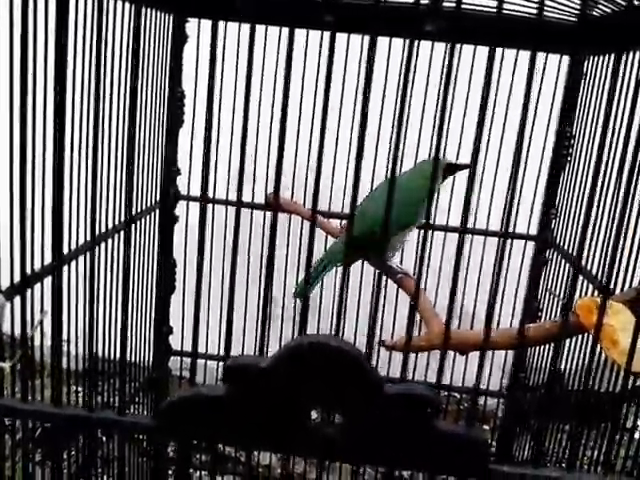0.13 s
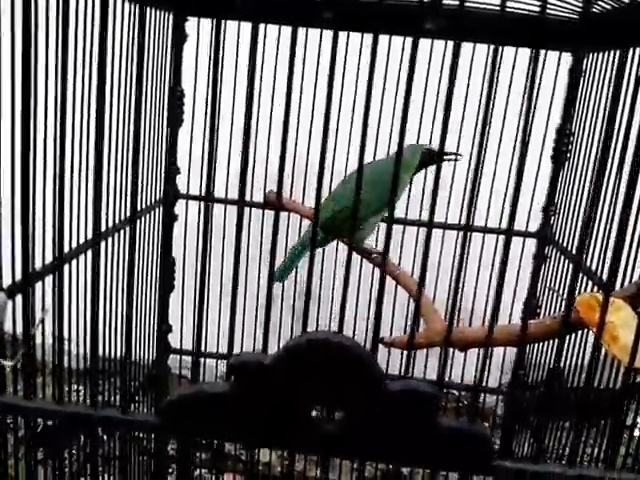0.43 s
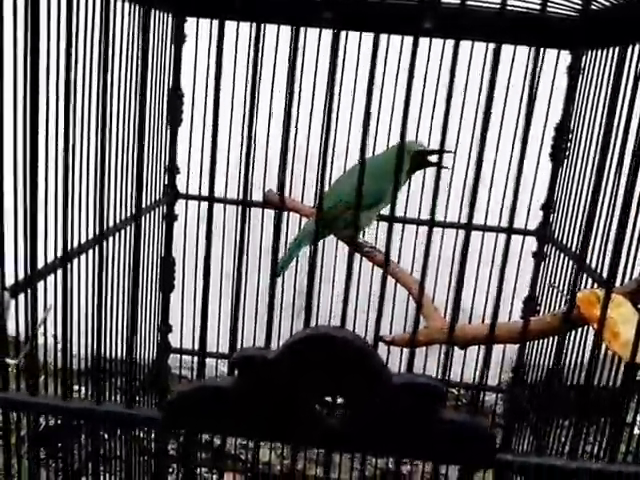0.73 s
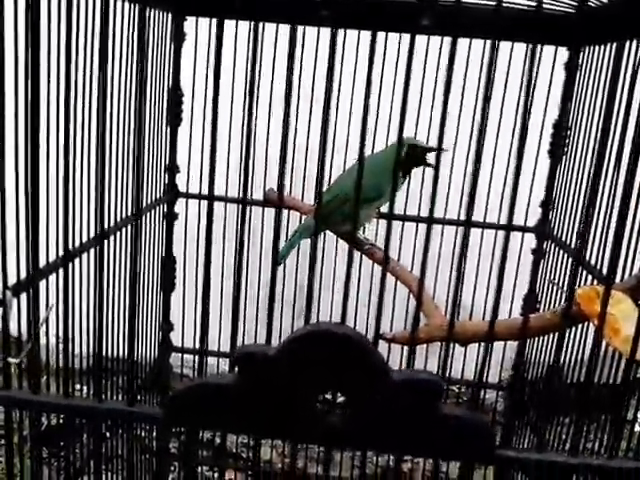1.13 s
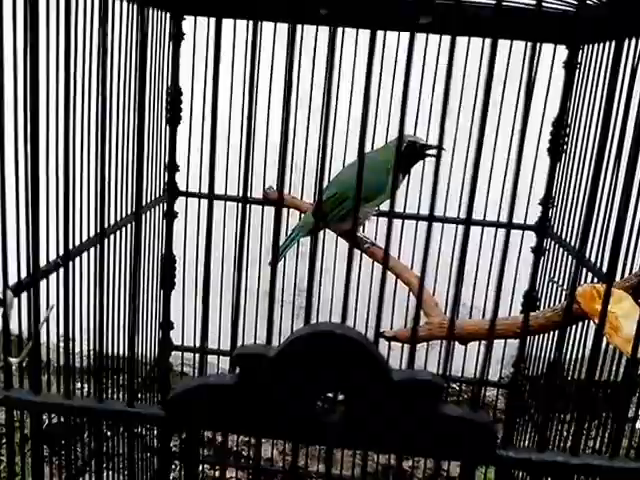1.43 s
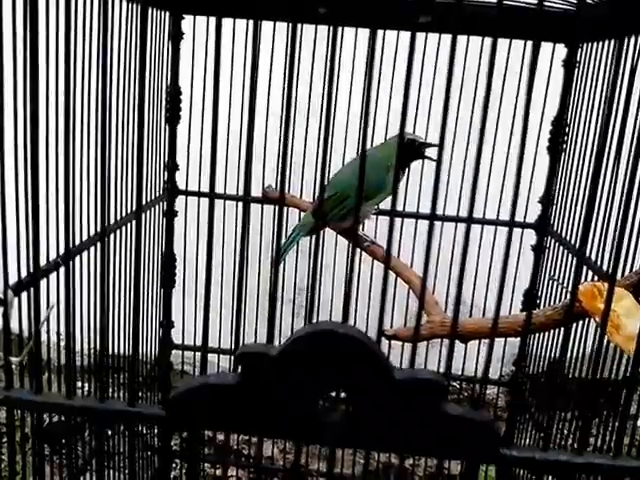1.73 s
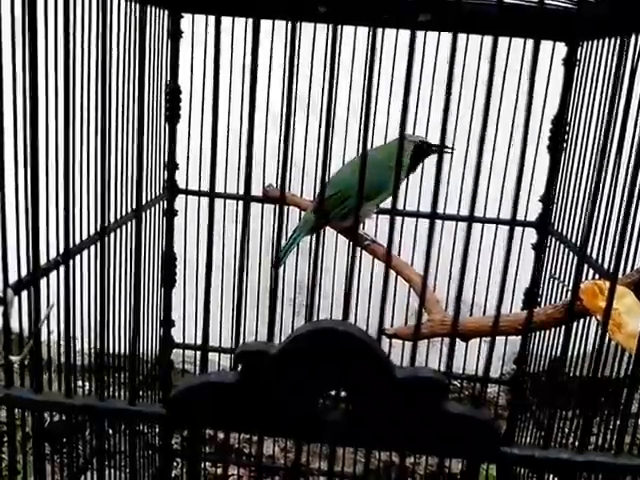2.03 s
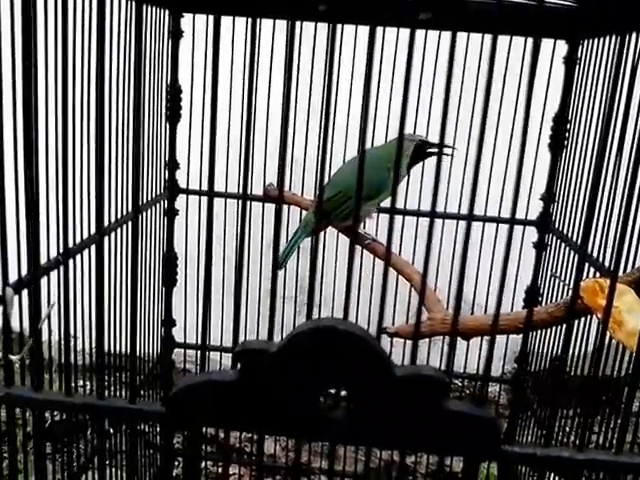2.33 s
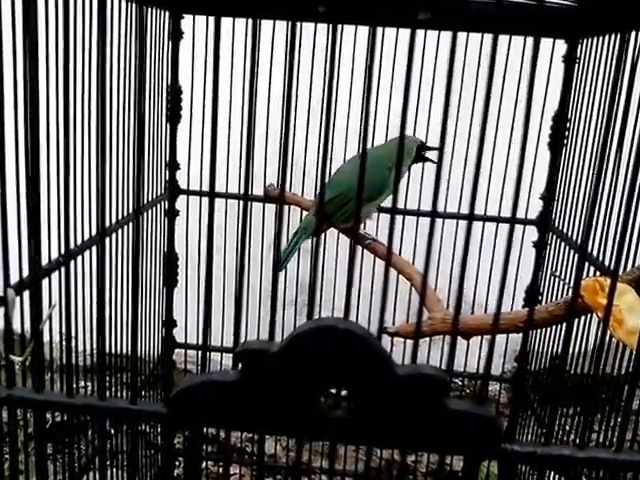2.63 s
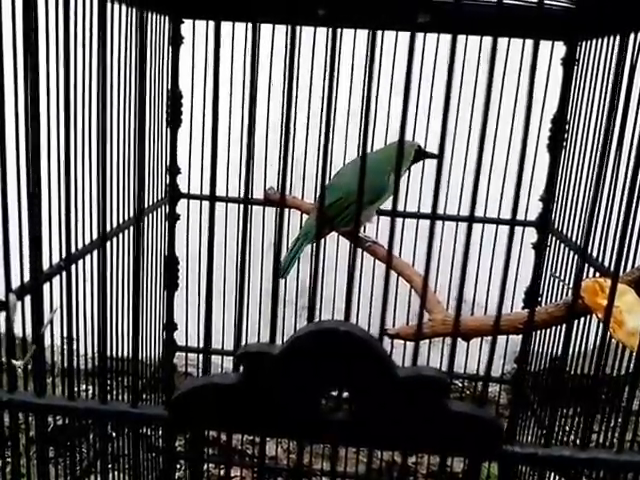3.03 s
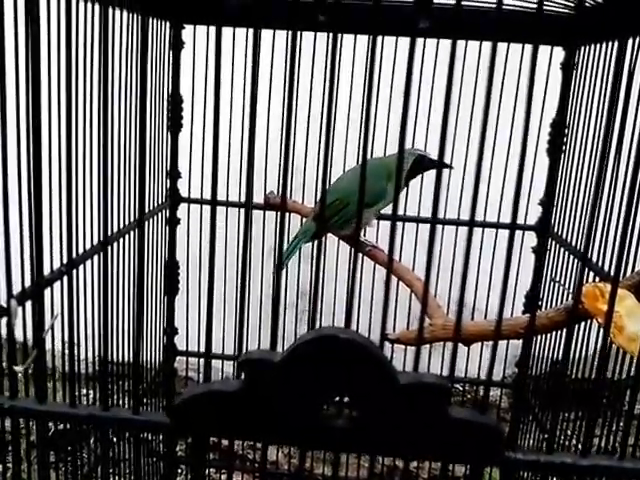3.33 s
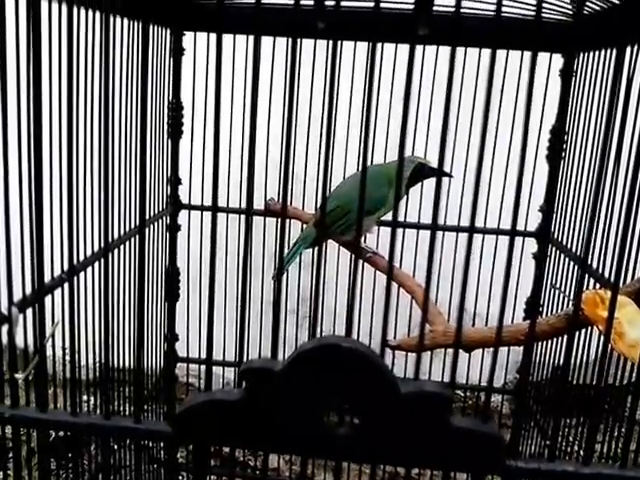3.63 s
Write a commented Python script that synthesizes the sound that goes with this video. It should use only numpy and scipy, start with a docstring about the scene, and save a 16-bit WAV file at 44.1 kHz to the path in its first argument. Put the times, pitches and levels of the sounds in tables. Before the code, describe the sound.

Two quick runs of raspy bird chirps, close by, with traffic humming behind.

```python
"""Traffic rumbles from the start, with tyre noise, an engine's drone and faint distant tones.
At 0.4 s a small caged bird, close by, begins the first of two runs of quick chirps. Each run begins
with a clean chirp; the others open as a rasp and clear. Their harmonics arch in pitch while a throat
resonance slides down, and nearby walls add a short echo. Near 2 s the engine fades and the second run
begins. The rumble and a deeper engine swell under its last notes; after 2.8 s only traffic remains."""
import sys
import numpy as np
from scipy import signal
from scipy.fft import rfft, irfft
from scipy.io import wavfile
from scipy.ndimage import map_coordinates

SR = 44100
rng = np.random.default_rng(int(sys.argv[2]) if len(sys.argv) > 2 else 0)


def put_to_file(sound):
    """Save the sound as 16-bit audio at rate SR, in the file named by the first command-line argument."""
    columns = np.atleast_2d(sound).T  # one column per channel
    safe = np.clip(columns, -1, 1)
    whole_steps = np.round(safe * 32767)
    wavfile.write(sys.argv[1], SR, whole_steps.astype(np.int16))


N = 167580

# Spectrum of the street noise. Each row: frequency in Hz, relative density in dB.
STREET_SPECTRUM = [(15, -80), (25, -43.5), (35, -27.5), (50, -5.5), (70, 0), (102, 1), (150, -1.5),
                   (230, -11), (278, -15), (306, -17), (428, -18.5), (506, -22), (627, -23), (796, -25),
                   (1030, -20.5), (1170, -23.5), (1630, -22.5), (2170, -28), (6500, -45.5), (7500, -52.5),
                   (9750, -77.5), (16500, -120)]
# Swell of the road's rumble. Each row: time in seconds, gain in dB.
RUMBLE_GAIN = [(0, -2.5), (.35, -2), (.72, -5.5), (1.0, -0.5), (1.4, -1), (1.75, -2.5), (1.95, -1),
               (2.33, -2.5), (2.52, 3.5), (2.85, 6), (3.02, 0), (3.2, 3.5), (3.42, -2), (3.6, 0), (3.8, 0)]
# Swell of the tyre noise. Each row: time in seconds, gain in dB.
TYRE_GAIN = [(0, 2.5), (.6, 3.5), (1.3, 1.5), (2.0, 2.5), (3.8, 1.5)]
# Course of the first engine. Each row: time in seconds, firing rate in Hz, level in dB.
ENGINE_COURSE = [(0, 92.81, -29.5), (.5, 95.82, -25.5), (.75, 99.02, -20.5), (1.05, 100.5, -20),
                 (1.45, 105.7, -19), (1.75, 108.7, -20), (2.0, 106.3, -33), (2.3, 101.7, -43),
                 (3.8, 99.3, -62)]
# Its partials. Each row: multiple of the firing rate, relative level in dB.
ENGINE_PARTIALS = [(1, 2.5), (2, -5.5), (2.5, -19.5), (3, -16), (4, -15.5), (4.5, -18.5)]
# Course of the deeper engine. Each row: time in seconds, firing rate in Hz, level in dB.
DEEP_ENGINE_COURSE = [(0, 79.72, -39.5), (2.3, 79.96, -30), (2.55, 81.47, -20), (2.75, 81.1, -22),
                      (3.0, 77.2, -38), (3.4, 81.6, -35.5), (3.8, 83.4, -16.5)]
# Faint tones that die away. Each row: frequency in Hz, starting level in dB.
FADING_TONES = [(351.5, -33.5), (440.8, -32.5), (572.9, -37)]
# A distant whine. Each row: time in seconds, frequency in Hz, level in dB.
WHINE_COURSE = [(0, 420, -47), (.35, 433.3, -32.5), (.62, 443, -28.5), (.74, 446, -39), (.95, 456, -41),
                (1.1, 461, -49), (3.8, 414, -57.5)]
# A hum that comes and goes. Each row: time in seconds, frequency in Hz, level in dB.
HUM_COURSE = [(0, 147, -73), (.6, 145, -38), (.8, 144.6, -21), (1.0, 149, -38.5), (1.35, 155.1, -29.5),
              (2.2, 147.3, -35), (3.2, 148.6, -24), (3.4, 143.5, -50), (3.8, 146.6, -26)]
# The bird's chirps. Each row: start in seconds, length in seconds, top pitch in Hz, final droop as a
# share of that pitch, level in dB, first and last throat resonance in Hz, share of the length before
# the resonance slides, rasp strength in dB, treble leak in dB, share of the length before the fade.
CHIRP_NOTES = [(0.422, 0.069, 669, 0.12, -20, 3930, 1420, 0.26, -18, -13.5, 0.7),
               (0.515, 0.048, 677, 0.02, -20, 3850, 3400.0, 0.3, -5, -28, 0.77),
               (0.593, 0.047, 697.0, 0.29, -18.1, 4660.0, 3320.0, 0.14, -2, -25, 0.62),
               (0.68, 0.049, 715, 0.05, -20, 5150, 3200, 0.32, -3.5, -19.5, 0.88),
               (0.78, 0.059, 744, 0.25, -19.5, 5270.0, 3150, 0.28, 0.5, -27.5, 0.84),
               (0.886, 0.067, 744, 0.38, -20, 5180.0, 3280.0, 0.27, 3.5, -30, 0.75),
               (0.991, 0.056, 732, 0.25, -17, 5370, 3020.0, 0.23, -1, -28, 0.73),
               (1.091, 0.063, 732, 0.17, -17, 5520, 2710.0, 0.41, -1, -38, 0.85),
               (1.208, 0.058, 741.0, 0.23, -17, 5400, 3240.0, 0.2, 1, -30, 0.82),
               (1.322, 0.071, 727, 0.24, -16, 4900, 2080, 0.31, 6.5, -26, 0.81),
               (1.446, 0.07, 759, 0.32, -16.3, 4920, 2430, 0.31, 2.5, -24, 0.78),
               (1.577, 0.059, 767.4, 0.18, -16, 5070, 2690.0, 0.3, -0.5, -27, 0.89),
               (1.71, 0.075, 723, 0.23, -16, 5150, 2110.0, 0.21, 3, -23.5, 0.78),
               (1.915, 0.079, 684.0, 0.27, -18, 3880, 1670, 0.25, -26, -30.5, 0.68),
               (2.04, 0.071, 680, 0.4, -27, 3930.0, 3100, 0.5, 2, -29, 0.9),
               (2.124, 0.066, 707.5, 0.23, -21.5, 4210.0, 3400, 0.3, 3.5, -37, 0.64),
               (2.222, 0.067, 723, 0.05, -23.5, 4380, 1595, 0.43, 2.5, -34, 0.38),
               (2.36, 0.056, 720, 0.2, -17, 4570, 2510.0, 0.24, 0.5, -21.5, 0.8),
               (2.482, 0.055, 728, 0.04, -19, 5200, 3340, 0.14, -2.5, -38, 0.85),
               (2.599, 0.067, 722, 0.2, -20, 5270, 2700, 0.18, -2, -33, 0.79),
               (2.727, 0.081, 689, 0.28, -17.0, 4550, 2030, 0.24, -5, -36, 0.68)]
# Vocal effort through a chirp. Each row: share of its length, relative level in dB.
VOCAL_EFFORT = [(0, -15), (.18, -7), (.32, 1.2), (.6, 2), (.82, 2)]
# Constant colour of the voice. Each row: frequency in Hz, gain in dB.
VOICE_COLOUR = [(700, -32), (1100, -23.5), (1480, 10), (2150, 6.4), (2500, 6), (2850, 6.5), (3150, 4),
                (3500, -2.5), (4300, -2.2), (5100, -2.5), (6100, -4.5), (7100, -1.5), (8000, -19)]


def undb(db):
    """Amplitude grows tenfold with every 20 dB."""
    return 10 ** (np.asarray(db) / 20)


def unit(x):
    """Normalisation brings a signal to an rms of 1."""
    return x / np.sqrt(np.mean(x ** 2) + 1e-18)


def colour(hz, points):
    """A response curve joins (Hz, dB) points over log frequency to give the gain at hz."""
    f, db = np.array(points, float).T
    return undb(np.interp(np.log(np.maximum(hz, 1)), np.log(f), db))


def walk(rate, size=N):
    """Interpolated noise drifts with a spread near 1, changing rate times a second."""
    at = np.arange(size) * rate / SR
    return map_coordinates(rng.standard_normal(size), [at], order=3, mode="mirror")


def street(level_db=-20.5, crossover_hz=223, flicker_db=1.5):
    """Traffic noise is broadband: its low band swells as road rumble, its high band wavers as tyres."""
    t, hz = np.arange(N) / SR, np.fft.rfftfreq(N, 1 / SR)
    noise = irfft(rfft(rng.standard_normal(N)) * colour(hz, STREET_SPECTRUM), N)
    spectrum = rfft(unit(noise))
    low = 1 / (1 + (hz / crossover_hz) ** 4)
    rumble = irfft(spectrum * low, N) * undb(np.interp(t, *np.array(RUMBLE_GAIN).T))
    tyre_db = np.interp(t, *np.array(TYRE_GAIN).T) + flicker_db * walk(14)
    tyres = irfft(spectrum * (1 - low), N) * undb(tyre_db)
    return undb(level_db) * (rumble + tyres)


def drone(course, wobble, orders=((1, 0),), flutter_db=2):
    """A nearly periodic source sounds at multiples of its slightly unsteady rate."""
    t = np.arange(N) / SR
    at, hz, db = np.array(course, float).T
    rate = np.interp(t, at, hz) * (1 + wobble * walk(20))
    phase = 2 * np.pi * np.cumsum(rate) / SR
    partials = sum(undb(order_db + flutter_db * walk(9.9)) * np.sin(k * phase + rng.uniform(0, 2 * np.pi))
                   for k, order_db in orders)
    return unit(partials) * undb(np.interp(t, at, db))


def engines():
    """Firing rate sets the pitch of two engines; the deeper sounds only its fundamental."""
    first = drone(ENGINE_COURSE, wobble=.0099, orders=ENGINE_PARTIALS)
    return first + drone(DEEP_ENGINE_COURSE, wobble=.025)


def far_tones(fade_db_per_s=19.5):
    """Single wavering partials carry from further down the street as hums and whines."""
    fading = sum(drone([(0, hz, db), (2, hz, db - 2 * fade_db_per_s)], wobble=.0065)
                 for hz, db in FADING_TONES)
    hum = drone(HUM_COURSE, wobble=.02, flutter_db=1.5)
    whine = drone(WHINE_COURSE, wobble=.006, flutter_db=0)
    return fading + hum + whine


def after(progress, share):
    """A linear ramp rises from 0 at a share of the chirp to 1 at its end."""
    return np.clip((progress - share) / (1 - share), 0, 1)


def throat(hz, centre, treble_db, bass_db=-20, relative_half_width=.17):
    """A resonance favours frequencies near its centre; some bass and treble leak past it."""
    detune = np.log(np.maximum(hz, 1) / centre) / relative_half_width
    leak = undb(bass_db + (treble_db - bass_db) * (1 + np.tanh(detune)) / 2)
    return (1 / (1 + detune ** 2) + leak) * colour(hz, VOICE_COLOUR)


def chirp(length, top_hz, droop, db, start_hz, end_hz, hold, rasp_db, treble_db, fade_at):
    """Source and filter: a falling resonance shapes arching harmonics; any opening rasp soon clears."""
    size, arch_top, fade_db, edge_s = 6000, .55, 25.5, .0051
    t = np.arange(size) / SR
    progress = np.minimum(t / length, 1)
    rasp = undb(rasp_db) / (1 + (progress / .36) ** 6)  # halved 36% of the way through
    rise = .19 * np.maximum(1 - progress / arch_top, 0) ** 2
    fall = droop * after(progress, arch_top) ** 2.26
    jitter = (.004 + .03 * rasp) * walk(727, size)
    pitch = top_hz * (1 - rise - fall) * (1 + jitter)
    phase = 2 * np.pi * np.cumsum(pitch) / SR
    centre = start_hz * (end_hz / start_hz) ** after(progress, hold)
    tone, air = np.zeros((2, size))
    for k in range(1, 14):
        shimmer = undb(3 * walk(137.6, size))
        harmonic = np.sin(k * phase + rng.uniform(0, 2 * np.pi))
        tone += throat(k * pitch, centre, treble_db) * shimmer * harmonic
    for hz in range(1200, 8400, 400):  # noise bands, resonating a little lower than the tone
        band = walk(616, size) * np.sin(2 * np.pi * (hz * t + rng.random()))
        low_cut = 1 / (1 + (2600 / hz) ** 4)
        air += throat(hz, .89 * centre, treble_db) * low_cut * band
    air *= rasp * undb(-4) + undb(-10)  # some breath outlasts the rasp
    effort = undb(np.interp(progress, *np.array(VOCAL_EFFORT).T) - fade_db * after(progress, fade_at))
    edges = np.clip(t / edge_s, 0, 1) * np.clip((length - t) / edge_s + 1, 0, 1)
    return unit(effort * edges * (tone + air)) * undb(db) * np.sqrt(length * SR / size)


def wall_echo(direct, level_db=-9.5, t60_s=.26, delay_s=.0027, waver_s=.00006):
    """Nearby walls reflect; a slight waver in the echo's delay smears its ringing into a diffuse tail."""
    t = np.arange(SR // 2) / SR
    tail = rng.standard_normal(len(t)) * np.exp(-np.log(1000) * t / t60_s) * (t > delay_s)
    echo = signal.fftconvolve(direct, undb(level_db) * tail / np.linalg.norm(tail))
    waver = waver_s * SR * walk(60, len(echo))
    echo = map_coordinates(echo, [np.arange(len(echo)) + waver])
    return echo + np.pad(direct, (0, len(echo) - len(direct)))


def bird():
    """Two runs of chirps overlap with their own echoes by superposition."""
    song = np.zeros(N)
    for start, *note in CHIRP_NOTES:
        sound = wall_echo(chirp(*note))
        i = int(start * SR)
        song[i:i + len(sound)] += sound[:N - i]
    return song


def scene():
    """The pressures of traffic and bird add in one channel."""
    return (street() + engines() + far_tones() + bird())[None]


def record(dry, ceiling=.95, cutoff_hz=7400):
    """Saturation rounds the highest peaks; two low-pass filters soften the top, then cut it steeply."""
    rounded = dry / (1 + (dry / ceiling) ** 4) ** .25
    soft = signal.sosfilt(signal.butter(8, cutoff_hz, fs=SR, output="sos"), rounded)
    return signal.sosfilt(signal.cheby1(10, .1, cutoff_hz, fs=SR, output="sos"), soft)


dry = scene()
out = record(dry)
put_to_file(out)
```